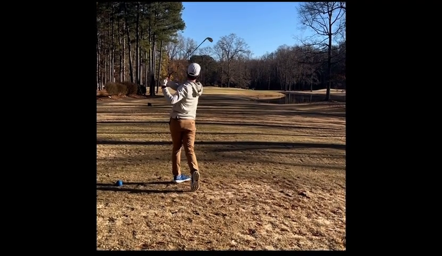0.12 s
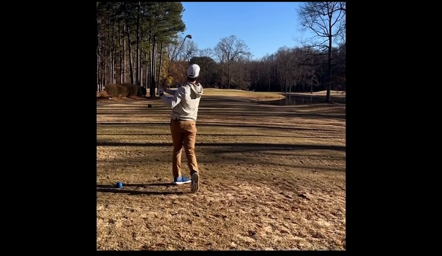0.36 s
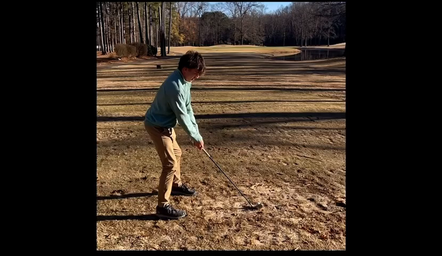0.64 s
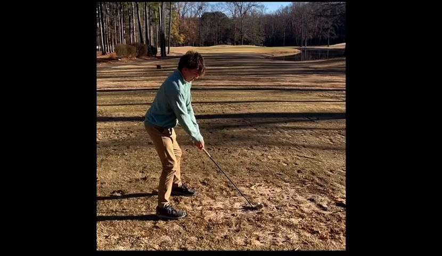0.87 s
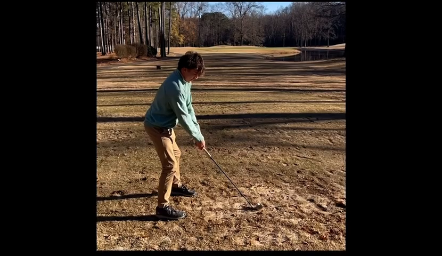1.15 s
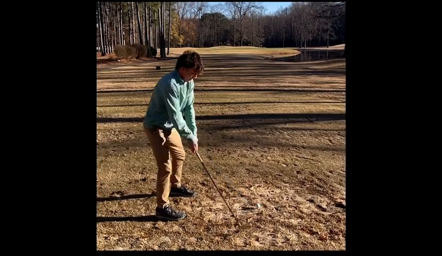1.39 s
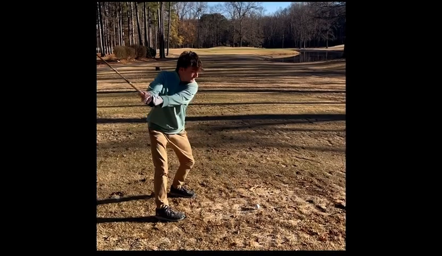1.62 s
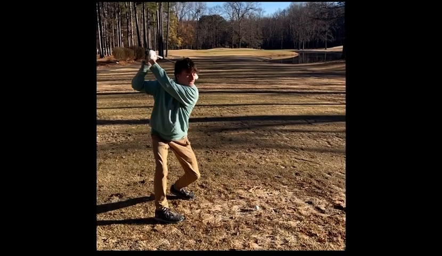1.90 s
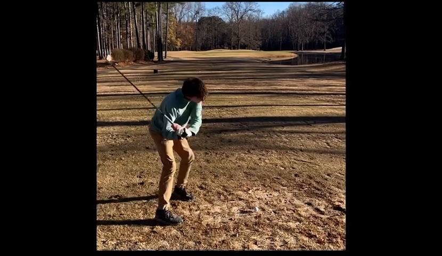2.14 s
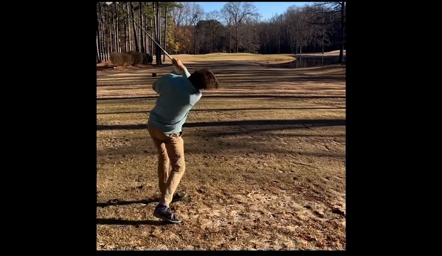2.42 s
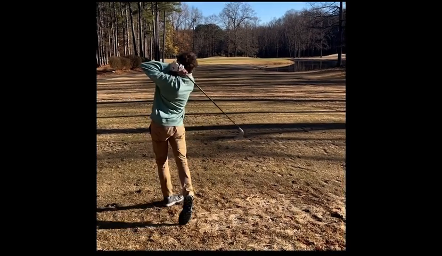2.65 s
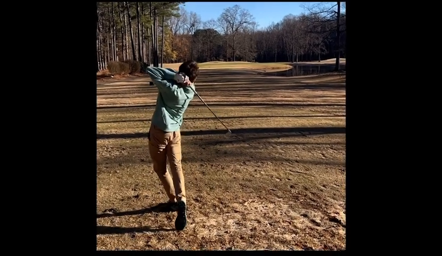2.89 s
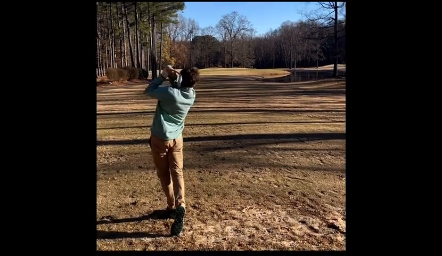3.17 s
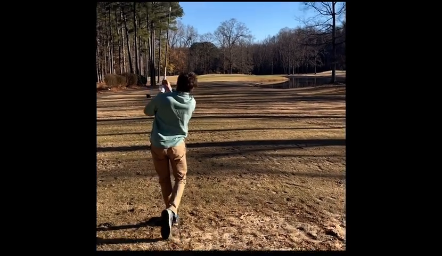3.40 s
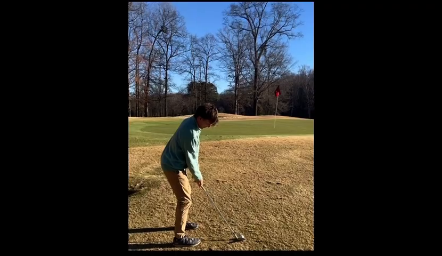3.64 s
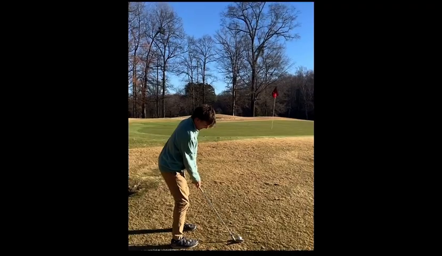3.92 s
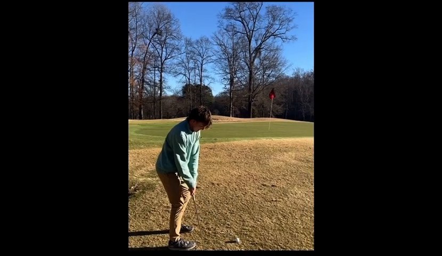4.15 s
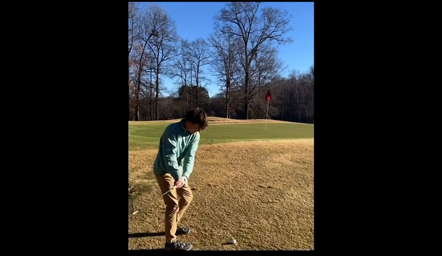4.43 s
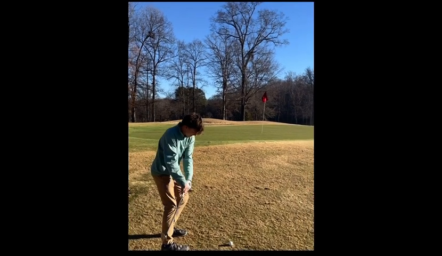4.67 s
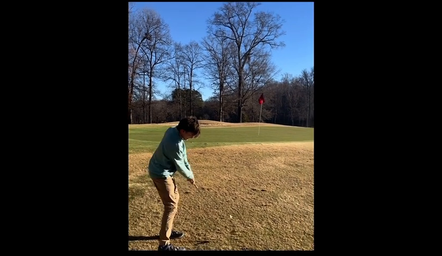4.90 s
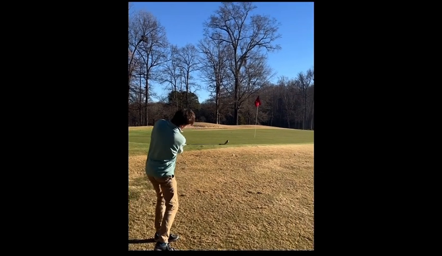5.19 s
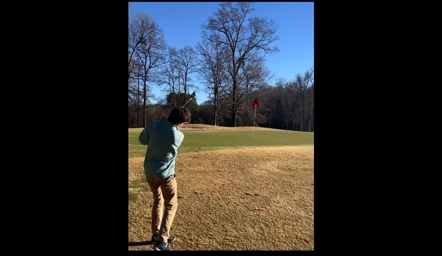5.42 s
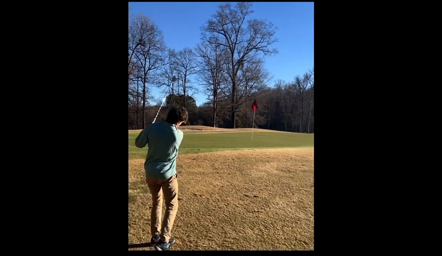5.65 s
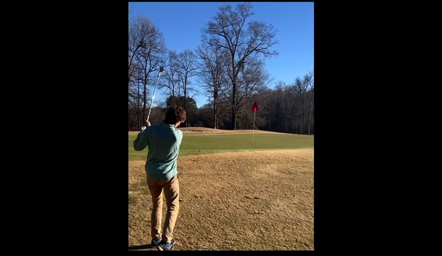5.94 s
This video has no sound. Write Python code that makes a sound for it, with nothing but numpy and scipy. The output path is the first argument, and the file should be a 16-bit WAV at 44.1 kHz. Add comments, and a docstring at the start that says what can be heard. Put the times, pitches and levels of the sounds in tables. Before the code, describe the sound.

A stereo pickup stands a few metres from golfers on an open course edged with trees. Low motor tones, a faint fluttering whine and soft far traffic wash continue throughout, briefly dipping to silence at 0.64 and 3.44 seconds. From 0.25 to 0.64 a small, very high bird warbles faintly. At 1.2 to 1.4 come light cloth rustles and crisp ticks, the clearest at 1.34. Faint rustling leads into a quick rising whoosh just after 2.1, then at 2.24 a loud, dry iron crack with a short turf thud. Echoes scatter off the trunks for under a second, amid dull grass hiss and little ticks until about 3.0; another rustle and click come around 3.3 to 3.4. The last passage has a fuller drone, a tiny tick at 4.24, a soft, woody chip at 4.85 with a brief brush, faint rustling and barely audible high peeps, ending around 6.

```python
"""A distant motor drones, and a small bird soon warbles very high over it, on a golf course.
Three passages joined by quick fades: a full iron swing whooshes, cracks and thuds into the turf and
echoes off the trees; later comes a soft chip. Clothes and dry grass rustle, tick and hiss.
Impacts are sums of decaying modes, rustles are shaped noise, bird and motor are gliding or wavering
sines; two microphone ports hear them with level and phase differences."""
import sys
import numpy as np
from scipy import signal
from scipy.fft import rfft, irfft, next_fast_len
from scipy.io import wavfile
from scipy.ndimage import uniform_filter1d

SR = 44100
rng = np.random.default_rng(int(sys.argv[2]) if len(sys.argv) > 2 else 0)


def level_to_linear(level):
    """Convert decibel levels to linear amplitude factors, elementwise."""
    exponent = np.asarray(level, float) / 20
    return 10 ** exponent


def master_out(mix):
    """Clip the mix to full scale and print it as 16-bit PCM to the path in sys.argv[1]."""
    frames = np.transpose(np.atleast_2d(mix))
    ceiling = np.clip(frames, -1, 1)
    pcm = np.round(ceiling * 32767).astype(np.int16)
    wavfile.write(sys.argv[1], SR, pcm)


N = 266937  # samples

# The silent instants between passages, in seconds.
JOINS = [.638, 3.436]
# The two ports. Each row: frequency in Hz, likeness of diffuse sound at both (0-1),
# left-right level difference in dB, phase by which the left leads in radians.
PORTS = [(0, 1, -0.5, 0), (300, 0.84, 1.5, -0.68), (697, 0.35, -4.5, -1), (1190, 0.42, -3, -3.5),
         (1890, 0.43, -2, -6), (2500, 0.22, -1.5, -2), (3400, 0.13, -2.5, -2), (4310, 0.31, -1.5, 2.5),
         (5170, 0.95, -2, 1.16), (5834, 0.94, 0.5, 3), (16400, 0.89, 0, 18)]
# The two club strokes. Each row: start in seconds, ring gain in dB, crack peak in dB, turf thud peak in dB.
STROKES = [(2.2356, 1, -14, -27.5), (4.8501, -22.5, -31.5, -60.5)]
# How the ball's sound reaches the ports, a table a stroke. Each row: frequency in Hz,
# left-right level difference in dB, phase by which the left leads in radians.
BALL_PATHS = [
    [(0, -1, 2.5), (350, -0.5, -2.4), (600, -3, -2), (1148, -9.5, -2.9), (1500, -7.5, 3.2),
     (2046, -6, -1.1), (2615, 2.5, 3.1), (3500, -8.5, -2.5), (4100, -5, 0.9), (4635, 5.5, 3),
     (5900, 7.5, 4), (7700, -2, 5), (9280, 1, 6.5), (10300, 2.5, 10.5), (11670, 1.5, 13),
     (15500, -0.5, 16.5)],
    [(0, -3, 1), (352, 5, -4), (600, -3.5, -0.6), (1150, -11, -1.5), (1500, -6, -0.5), (2040, -1, 1),
     (2600, -7, -0.5), (3500, 2, -2), (4100, 7, -0.5), (4700, -4, 0.5), (5900, -11, 3.1), (9400, -7, 7.5),
     (16270, -1, 18)],
]


def evened(x):
    """Normalization: scales a signal to an rms of 1."""
    return x / np.sqrt(np.mean(x ** 2) + 1e-20)


def read_spectrum(points, hz):
    """Spectral envelope: dB interpolated over log frequency, -90 dB outside the points."""
    f, value = np.transpose(points)
    return np.interp(np.log(hz + 1), np.log(f + 1), value, -90, -90)


def port(column, hz):
    """Frequency response: one column of the port table, interpolated over frequency."""
    return np.interp(hz, *np.array(PORTS)[:, [0, column]].T)


def add(mix, s, sound):
    """Superposition: adds a sound to the mix from s seconds on."""
    part = mix[round(s * SR):][:len(sound)]
    part += sound[:len(part)]


def wander(hz, count=N):
    """Low-passed random process of rms 1, changing about hz times a second."""
    lowpass = signal.butter(2, hz, fs=SR, output="sos")
    settled = signal.sosfilt(lowpass, rng.standard_normal(count + SR))[SR:]
    return evened(settled)


def noise(gain, likeness, size):
    """Partial coherence: random short-time spectra (gain: bins x frames), partly shared by the ports."""
    hz = np.fft.rfftfreq(size, 1 / SR)
    a, b, c, d = rng.standard_normal((gain.shape[1], len(hz), 4)).T
    shared, apart = a + 1j * b, c + 1j * d
    same = np.clip(likeness, 0, 1)[:, None]
    tilt = level_to_linear(port(2, hz) / 2)[:, None]
    lag = np.exp(-1j * port(3, hz))[:, None]
    right = (same * shared + np.sqrt(1 - same ** 2) * apart) * lag
    spectra = np.array([shared * tilt, right / tilt]) * gain
    return signal.istft(spectra, nperseg=size, noverlap=size * 3 // 4)[1][:, :N]


def heard(x, path=None):
    """Interaural-style cues: a point source's level step and phase lead, split between the sides."""
    size = next_fast_len(N)
    hz = np.fft.rfftfreq(size, 1 / SR)
    at, step_db, lead = np.transpose(path) if path else np.array(PORTS).T[[0, 2, 3]]
    half = level_to_linear(np.interp(hz, at, step_db) / 2) * np.exp(.5j * np.interp(hz, at, lead))
    return irfft(rfft(x, size) * np.array([half, 1 / half]), size)[:, :N]


def passage_at(t):
    """Time partition: index of the passage that holds each time."""
    return np.searchsorted(JOINS, t)


def through_passage(t, first, last):
    """Linear glide: a value that moves evenly from first to last in each passage."""
    edges, k = np.array([0, *JOINS, N / SR]), passage_at(t)
    along = (t - edges[k]) / np.diff(edges)[k]
    return np.take(first, k) + np.subtract(last, first)[k] * along


def stroke(modes, ring_db, crack_db, thud_db, rise_cycles, rebound_s, rebound_db):
    """Modal impact: a crack, short modes with two weaker rebounds, then the head thuds into the turf."""
    t = np.arange(3000) / SR
    hz, db, t60 = np.transpose(modes)[:, :, None]
    # high modes speak first while the ball flattens on the face
    swell = 1 - np.exp(-(t * hz / rise_cycles) ** 2)
    # a closely split pair starts opposed and swells
    sides = np.where(np.diff(hz, axis=0, prepend=0) < .08 * hz, -1, 1)
    ring = (sides * swell * level_to_linear(db - 60 * t / t60) * np.sin(2 * np.pi * hz * t)).sum(axis=0)
    # the ring carries no deep bass
    ring = level_to_linear(ring_db) * signal.lfilter(*signal.butter(2, 260, "highpass", fs=SR), ring)
    bounces = np.zeros(len(t))
    first, second = round(rebound_s * SR), round(1.85 * rebound_s * SR)
    bounces[[first, second]] = level_to_linear(rebound_db), level_to_linear(rebound_db - 5.5)
    rebounds = np.convolve(ring, bounces)[:len(t)]
    ring = ring + signal.lfilter(*signal.butter(1, 3000, fs=SR), rebounds)  # duller

    band = signal.butter(1, [4500, 12000], "bandpass", fs=SR, output="sos")
    crack = signal.sosfilt(band, rng.standard_normal(len(t))) * level_to_linear(-60 * t / 0.0028)

    # soil softens as the head digs in: the thud falls by 260 Hz towards 160 Hz
    falling = 2 * np.pi * np.cumsum(160 + 260 * np.exp(-t / .007)) / SR
    thud = level_to_linear(thud_db) * np.sin(falling) * np.exp(-((t - .015) / .008) ** 2)
    return ring + level_to_linear(crack_db) * crack / abs(crack).max() + thud


def trees(x):
    """Discrete multipath: sparse echoes from trunks along the fairway, dulled by the air."""
    # Each row: delay in seconds, relative echo level in dB.
    echoes = [(.03, -25), (.1, -8.5), (.16, -7.5), (.27, -1.5), (.34, -6.5), (.45, -12), (.8, -19.5)]
    t = np.arange(SR) / SR
    sparse = rng.random(SR) < .1
    taps = rng.choice([-1., 1.], SR) * sparse * level_to_linear(np.interp(t, *np.transpose(echoes), -99, -99))
    dulling = signal.butter(2, 5000, fs=SR, output="sos")
    taps = signal.sosfilt(dulling, taps / np.linalg.norm(taps))
    return level_to_linear(-23) * heard(signal.oaconvolve(x, taps)[:N])


def strokes():
    """Modal synthesis: both clubs meet the ball, heard directly and by way of the trees."""
    # Club face and ball, a table a club. Each row: mode frequency in Hz, relative level in dB, t60 in seconds.
    clubs = [
        [(348, -18.5, 0.037), (600, -11, .016), (980, -19.5, .009), (1264.4, -6.5, 0.01),
         (1482.5, -7.5, 0.0079), (1710, -0.5, .007), (2053, -11.5, 0.006), (2720, -12.5, 0.017),
         (3340, -16, .014), (3700, -16.5, .012), (4150, -20, .01), (5600, -11.5, .004), (7715, -4.5, .0045),
         (9370, -11, .003), (11310, -19, .005)],
        [(740, -5.5, 0.023), (1115, -1.5, 0.028), (1403, -2, 0.021), (1760, 10.5, 0.0084), (2500, -15, 0.0066),
         (2940, -15, 0.013), (3516, 3, 0.011), (3645, 2, .012), (5000, -6, .007), (6680, -12, .005),
         (8800, -12, .004)],
    ]
    # A row a club: rise in cycles of each mode, rebound delay in seconds, rebound level in dB re the ring.
    contacts = [(.6, 0.002, -18.5), (1.7, .0034, -16)]
    out = np.zeros((2, N))
    for modes, contact, path, (s, *blow) in zip(clubs, contacts, BALL_PATHS, STROKES):
        club = np.zeros(N)
        add(club, s, stroke(modes, *blow, *contact))
        out += heard(club, path) + trees(club)
    return out


def whoosh():
    """Vortex shedding: a noise band and its octave climb and swell as the shaft speeds up to the iron's blow."""
    length_s, low_hz, high_hz = 0.093, 300, 630
    speed = np.linspace(0, 1, round(length_s * SR))
    phase = 2 * np.pi * np.cumsum(low_hz + (high_hz - low_hz) * speed) / SR
    band = np.sin(phase) * wander(121.0, count=len(speed))
    octave = level_to_linear(-5.5) * np.sin(2 * phase) * wander(250., count=len(speed))
    level = level_to_linear(-34 - 15 * (1 - speed) ** 2) * signal.windows.tukey(len(speed), .1)  # rises by 15 dB
    shaft = np.zeros(N)
    add(shaft, STROKES[0][0] - length_s, level * (band + octave))
    return heard(shaft, BALL_PATHS[0])


def brushing(gestures, flicker_db, size):
    """Stick-slip friction: hiss between two colours; fibres let go in bursts, so all bands flicker together."""
    # The crisp and the dull colour. Each row: frequency in Hz, relative level in dB.
    crisp = [(1500, -31.5), (3000, -9), (5000, -6.5), (8000, -2), (11000, -3), (13500, -11), (15500, -25.5)]
    dull = [(700, -18), (1500, 15), (3000, 7), (5000, 2.5), (8000, -5.5), (11000, -8), (13500, -23),
            (15500, -28.5)]
    hz = np.fft.rfftfreq(size, 1 / SR)
    t = np.arange(N * 4 // size + 5) * size / 4 / SR
    gain = np.zeros((len(hz), len(t)))
    for s, db, rise_s, fall_s, dullness in gestures:
        colour = read_spectrum(crisp, hz) * (1 - dullness) + read_spectrum(dull, hz) * dullness
        away = np.maximum((s - t) / rise_s, (t - s) / fall_s)
        level = level_to_linear(db - 21 * away) * (passage_at(t) == passage_at(s))
        gain += np.outer(level_to_linear(colour), level)
    burst = flicker_db * (np.minimum(rng.exponential(1, len(t)), 4) - 1)
    # folds of cloth and tufts favour now one band, now another
    patches = uniform_filter1d(rng.standard_normal(gain.T.shape).T, size=7, axis=0)
    patches = uniform_filter1d(patches, size=14, axis=1)
    gain = gain * level_to_linear(burst + 1.5 * evened(patches)) / np.sqrt(size * 3000 / SR)
    return noise(gain, np.maximum(port(1, hz), .6), size=size)


def swish():
    """Broadband flow and friction noise: the club head passes through air, then grass."""
    # Each row: loudest instant in seconds, relative level in dB, times to rise and to fall by 21 dB
    # in seconds, dullness 0-1.
    sweeps = [(2.213, -43, 0.041, 0.054, 0.95), (2.241, -40.5, 0.028, 0.0097, 0.85),
              (4.84, -43, 0.0034, 0.013, 0.56), (4.847, -41.5, 0.0077, .008, 0.7)]
    return brushing(sweeps, flicker_db=2.0, size=128)


def rustle():
    """Shaped noise: rustling of clothes and grass, the dull hiss after the iron's blow, and long faint hiss."""
    # Each row: loudest instant in seconds, relative level in dB, times to rise and to fall by 21 dB
    # in seconds, dullness 0-1.
    rustles = [(1.2, -79, 0.018, .15, .2), (1.27, -61.5, .06, 0.12, 0.08), (1.372, -60, 0.018, 0.015, 0.77),
               (1.62, -75.5, 0.46, .6, 0.44), (2.02, -68.5, 0.23, 0.3, 0.79), (2.29, -64, .02, 0.21, 0.94),
               (2.38, -61, 0.078, .2, 0.71), (2.45, -65.5, .15, 0.17, 0.55), (2.5, -72, .03, .04, 1),
               (2.54, -72, .15, .04, .65), (2.75, -71.5, 0.83, 1.3, .5), (3.13, -70.5, 0.17, 0.13, 0.35),
               (3.316, -60.5, 0.026, 0.1, 0.44), (3.38, -64, .04, 0.068, 0.71),
               (4.05, -81.5, .12, 0.35, .5), (4.24, -74, 0.039, .03, .5), (4.74, -87, 0.061, .3, .5),
               (5.05, -71, 0.3, 0.11, .4), (5.4, -91, 1.33, .45, .55)]
    return brushing(rustles, flicker_db=2.8, size=256)


def ticks():
    """Impulse response: a click and a wisp of noise excite one broad resonance for each tick."""
    # Small ticks of grip, grit and shoes, and the club brushing the grass just before the iron's blow.
    # Each row: start in seconds, peak level in dB, centre in Hz, width in Hz, t60 of the noise in seconds.
    tick_table = [(1.182, -62, 8500, 2500, .006), (1.198, -54, 11000, 7000, .004),
                  (1.205, -60, 12000, 5000, .004), (1.218, -60, 9500, 5000, .004),
                  (1.234, -48, 9000, 5000, .004), (1.239, -45, 10000, 5000, 0.0039),
                  (1.321, -57, 8500, 1500, .004), (1.34, -39, 3970, 3500, .004),
                  (1.3405, -27, 7360, 2000, 0.0055), (1.3405, -37.5, 12000, 5000, .002),
                  (1.345, -40, 7200, 1600, .007), (1.362, -52, 9500, 6000, .005),
                  (1.369, -46, 8600, 1500, 0.0065), (1.369, -47, 3180, 2500, .01),
                  (2.048, -40, 5700, 7560, 0.0069), (2.2335, -23, 3900, 1500, 0.0092),
                  (2.233, -24.5, 644, 500, 0.01), (2.444, -45, 8500, 3000, .005),
                  (2.613, -43.5, 9000, 10000, .008), (2.621, -40.5, 3000, 2500, 0.0077),
                  (2.71, -42, 600, 500, 0.014), (2.674, -55, 4500, 2500, .006),
                  (2.977, -58, 8000, 4000, .005), (2.844, -54, 7040, 5000, 0.0098),
                  (2.922, -49, 10500, 8000, .005), (3.316, -45, 7940, 5970, 0.024),
                  (3.338, -56, 6000, 5000, .01), (3.383, -36.5, 5070, 1185, 0.0076),
                  (4.238, -53, 8790, 6130, 0.0049), (5.59, -68, 9500, 3990, .006)]
    out, t = np.zeros(N), np.arange(1500) / SR
    for s, db, hz, width, t60 in tick_table:
        edges = np.clip([hz - width / 2, hz + width / 2], 300, 16000)
        grit = (t == 0) * 1.4 + rng.standard_normal(1500) * level_to_linear(-60 * t / t60)
        tick = signal.sosfilt(signal.butter(2, edges, "bandpass", fs=SR, output="sos"), grit)
        add(out, s, level_to_linear(db) * tick / abs(tick).max())
    return out


def whistled(glide, level, taper):
    """Frequency modulation: a sine of rms level follows a glide in Hz, with tapered ends."""
    phase = 2 * np.pi * np.cumsum(glide) / SR
    return np.sqrt(2) * level * np.sin(phase) * signal.windows.tukey(len(glide), taper)


def birds():
    """Frequency-modulated whistles with a slight quaver, blurred by echoes among the trunks."""
    # One bird's quick warble. Each row: time in seconds, frequency in Hz, level before the quaver in dB.
    warble = [(0.248, 8757, -95), (0.258, 8804, -71), (0.28, 7800, -77), (0.292, 8295, -88),
              (0.312, 8393, -88), (0.316, 8682, -73), (0.326, 8913, -81), (0.33, 8840, -61),
              (0.348, 8160, -74), (0.368, 8700, -68), (0.376, 8644, -61), (0.39, 8266, -80),
              (0.396, 8610, -94), (0.4, 8391, -84), (0.454, 9000, -74), (0.472, 8400, -65),
              (0.494, 8688, -69), (0.51, 7960, -68), (0.514, 8162, -87), (0.52, 8488, -78),
              (0.536, 8164, -91), (0.542, 8700, -89), (0.562, 8842, -70), (0.574, 8939, -77),
              (0.584, 8544, -63), (0.592, 8599, -61), (0.606, 8683, -80), (0.614, 8424, -62),
              (0.63, 8550, -72), (0.638, 8716, -91)]
    # A farther bird. Each row: start in seconds, level before the quaver in dB.
    peeps = [(4.31, -96), (4.48, -89), (5.144, -89), (5.293, -95), (5.449, -85)]
    # Long thin notes far off. Each row: start in seconds, length in seconds, first Hz, last Hz,
    # level before the quaver in dB.
    whistles = [(0.352, 0.19, 4040, 3930, -89), (.52, .11, 5030, 4980, -93)]
    out = np.zeros(N)
    at, hz, db = np.transpose(warble)
    t = np.arange(at[0], at[-1], 1 / SR)
    glide = uniform_filter1d(np.interp(t, at, hz), size=90) + 25 * wander(150., count=len(t))
    add(out, at[0], whistled(glide, level_to_linear(np.interp(t, at, db)), .03))

    u = np.linspace(0, 1, round(0.14 * SR))
    glide = np.interp(u, [0, .25, 1], [9250, 9700, 9650])  # slides up quickly, then sags
    for s, db in peeps:
        add(out, s, whistled(glide, level_to_linear(db), .4))
    for s, length, first_hz, last_hz, db in whistles:
        glide = np.linspace(first_hz, last_hz, round(length * SR))
        add(out, s, whistled(glide, level_to_linear(db), .3))
    out *= level_to_linear(3. * wander(45.))  # quaver

    blur = rng.standard_normal(6000) * level_to_linear(-60 * np.arange(6000) / SR / .2)
    passage, echo = passage_at(np.arange(N) / SR), np.zeros(N)
    for k in range(len(JOINS) + 1):  # echoes end with their passage
        inside = passage == k
        echo += signal.oaconvolve(out * inside, blur)[:N] * inside
    return out + level_to_linear(-6.5) * echo / np.linalg.norm(blur)


def drone():
    """Additive synthesis: low motor tones swell and waver on the way over the fairway."""
    # One table a passage. Each row: frequency in Hz, then levels before drift in dB rms at even steps
    # from the start of the passage to its end.
    motor_tones = [
        [(61.4, -39, -55.5, -52), (90.2, -60, -52.5, -65), (124, -47, -44.5, -43.5), (150, -56, -46, -45),
         (180, -52, -58, -53.5), (189.5, -45.5, -54, -52), (249.7, -56, -51.5, -58.5), (309.6, -71, -61, -65.5)],
        [(59.5, -46, -47, -45.5), (90.7, -59, -48, -52), (118.7, -47.5, -49, -47.5), (150.8, -49, -54, -43.5),
         (193, -54, -49.5, -52.5), (218.8, -58.5, -57, -50), (237.8, -54, -60.5, -60), (292, -66, -65, -65)],
        [(61, -54, -55, -43.5, -45.5, -46, -44.5), (89.5, -37.5, -42, -43, -39.5, -45, -45),
         (120.8, -49, -42, -45.5, -47, -45, -53.5), (149.7, -56.5, -41, -40, -41.5, -50, -38),
         (179.8, -49, -50.5, -53.5, -54, -46.5, -51.5), (239.8, -52.5, -45, -48, -49.5, -54.5, -58),
         (268.5, -50.5, -61, -62, -62.5, -55, -59.5), (298.3, -57.5, -64.5, -60.5, -61.5, -59.5, -60.5)],
    ]
    t, out = np.arange(N) / SR, np.zeros(N)
    along = through_passage(t, np.zeros(3), np.ones(3))
    for k, tones in enumerate(motor_tones):
        for hz, *db in tones:
            drift_db = 1.38 * wander(2.5)  # each tone swells and sinks by itself
            level_db = np.interp(along, np.linspace(0, 1, len(db)), db) + drift_db
            phase = 2 * np.pi * (hz * t + rng.random()) + 0.13 * wander(3.0)
            out += np.sqrt(2) * level_to_linear(level_db) * np.sin(phase) * (passage_at(t) == k)
    return out


def whine():
    """Amplitude and phase modulation: the motor's fluttering whine and its second harmonic."""
    # A row a passage: first Hz, last Hz, resting level before flutter in dB.
    whine_glides = [(1480, 1488, -67), (1493, 1468, -73.5), (1504, 1507, -64)]
    # Moments when the air carries the whine louder. Each row: middle in seconds, half length in seconds,
    # added level before flutter in dB.
    swells = [(.07, .1, -60.5), (.55, 0.09, -63.5), (0.778, 0.19, -66), (1.2, 0.068, -68.5),
              (1.497, 0.094, -61.5), (1.785, 0.1, -62), (2.12, .1, -64), (3.05, 0.055, -60),
              (3.329, 0.098, -63), (3.49, 0.035, -53.5), (4.24, .09, -57.5), (4.653, .15, -64),
              (5.25, .12, -61), (5.649, .2, -61), (5.959, .05, -56.5)]
    # Level of the second harmonic before flutter in each passage, in dB.
    overtone_db = [-82, -80, -65]
    t = np.arange(N) / SR
    first_hz, last_hz, rest_db = np.transpose(whine_glides)
    level = level_to_linear(rest_db[passage_at(t)])
    for s, half, db in swells:
        level += level_to_linear(db) * np.exp(-((t - s) / half) ** 2)
    phase = 2 * np.pi * np.cumsum(through_passage(t, first_hz, last_hz)) / SR + 1.1 * wander(11.0)
    tone = level * level_to_linear(3.2 * wander(20.0)) * np.sin(phase)
    overtone_level = level_to_linear(np.take(overtone_db, passage_at(t)) + 3.9 * wander(9.))
    tone += overtone_level * np.sin(2 * phase + .6 * wander(25.))
    return heard(np.sqrt(2) * tone)


def air():
    """Diffuse field: far traffic and air as a steady wash, a colour for each passage, with faint patches."""
    # One spectrum a passage. Each row: frequency in Hz, relative density in dB per Hz.
    spectra = [
        [(24, -36), (40, -6), (132, -4), (189, -11), (208, -26.5), (251, -8), (276, -29), (304, -26),
         (1160, -32), (1240, -30), (1470, -30), (1780, -33.5), (3080, -49.5), (4200, -62), (12000, -74.5),
         (15600, -107), (22000, -120)],
        [(24, -32), (40, -11), (69, -5.5), (88, -15.5), (106, -8.5), (156, -9.5), (172, -22), (223, -12.5),
         (264, -22.5), (359, -27), (566, -32), (1130, -32), (1540, -30), (4960, -61), (12000, -82.5),
         (15600, -112), (22000, -120)],
        [(35, -20), (60, -11), (100, -2), (200, -11), (450, -25), (1200, -26.5), (1900, -26.5), (2350, -32.5),
         (2900, -32.5), (3250, -37.5), (3600, -37), (3950, -45), (4400, -40.5), (6000, -60.5), (8000, -70.5),
         (12000, -71.5), (15000, -95)],
    ]
    # Level of the wash in each passage, in dB rms.
    wash_db = [-40.5, -43, -41.5]
    hz, out = np.fft.rfftfreq(2048, 1 / SR), np.zeros((2, N))
    passage = passage_at(np.arange(N) / SR)
    for k, spectrum in enumerate(spectra):
        patches = uniform_filter1d(rng.standard_normal((N // 512 + 5, len(hz))).T, 12, axis=0)
        patches = uniform_filter1d(patches, 8, axis=1)
        gain = level_to_linear(read_spectrum(spectrum, hz)[:, None] + 0.99 * evened(patches))
        wash = noise(gain, port(1, hz), size=2048)
        out += level_to_linear(wash_db[k]) * evened(wash) * (passage == k)
    return out


def scene():
    """Superposition: the sum of all sources at the two ports."""
    golf = strokes() + whoosh() + swish()
    nearby = rustle() + heard(ticks() + birds())
    return golf + nearby + drone() + whine() + air()


def roll_off(x):
    """The treble ends steeply here."""
    return signal.sosfilt(signal.butter(12, 16460, fs=SR, output="sos"), x)


def record(dry):
    """Band limiting: microphones lose deep bass and top treble; each passage fades out, the next fades in."""
    t = np.arange(N) / SR
    bass_cut = signal.butter(4, 42, "highpass", fs=SR, output="sos")
    treble_cut = signal.butter(4, 14000, fs=SR, output="sos")
    band = np.vstack([bass_cut, treble_cut])
    fade = np.minimum(t / 0.0026, 1)  # opening fade, seconds
    for s in JOINS:
        fade = fade * np.minimum(abs(t - s) / 0.036, 1)  # seconds on each side
    return roll_off(signal.sosfilt(band, dry) * fade)


dry = scene()
out = record(dry)
master_out(out)
```